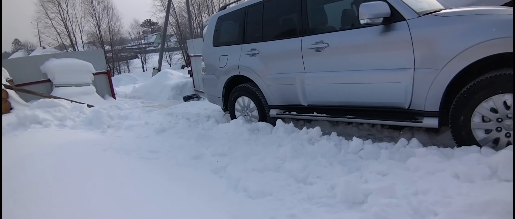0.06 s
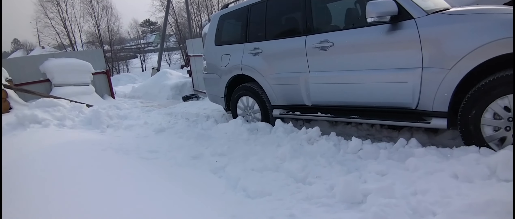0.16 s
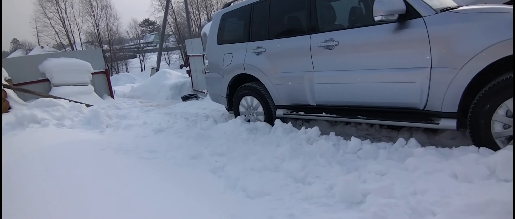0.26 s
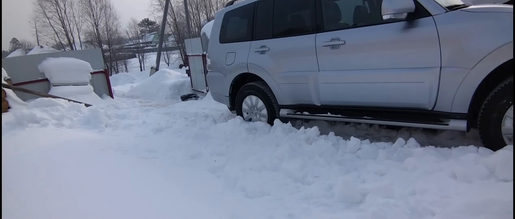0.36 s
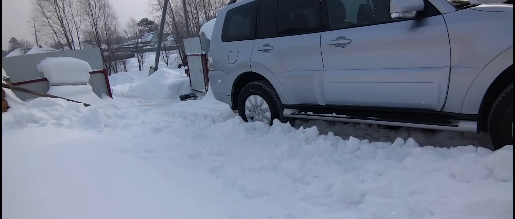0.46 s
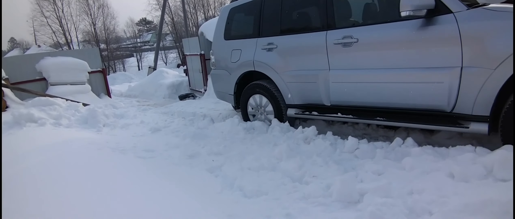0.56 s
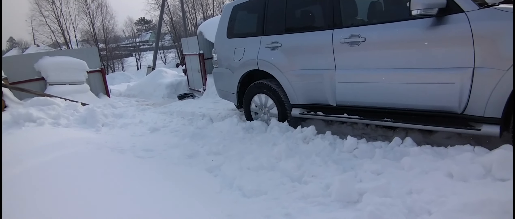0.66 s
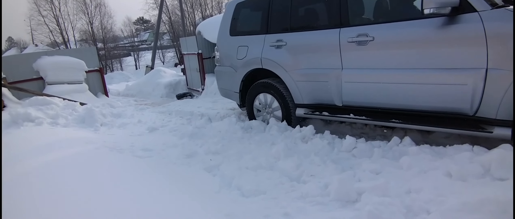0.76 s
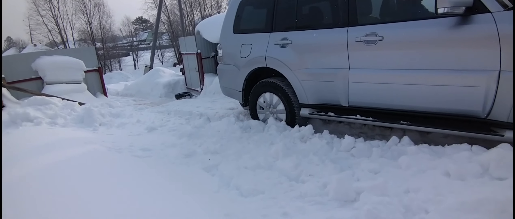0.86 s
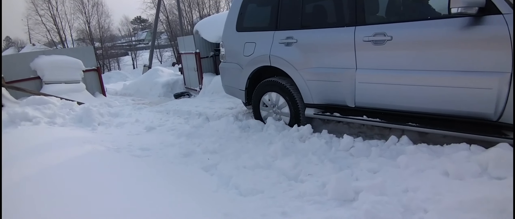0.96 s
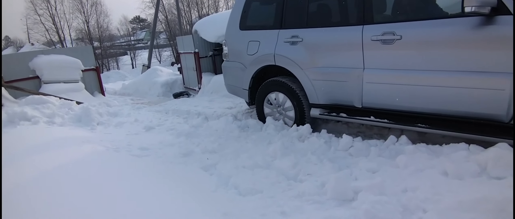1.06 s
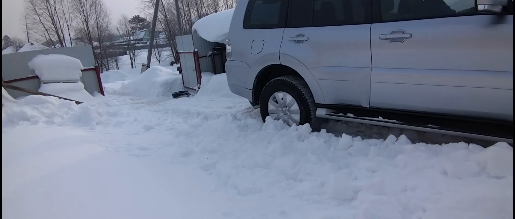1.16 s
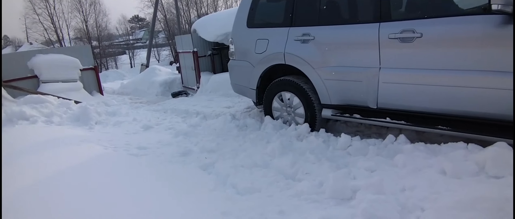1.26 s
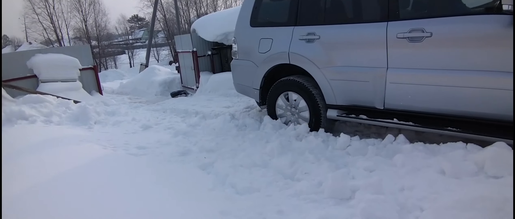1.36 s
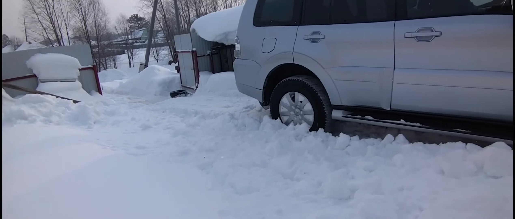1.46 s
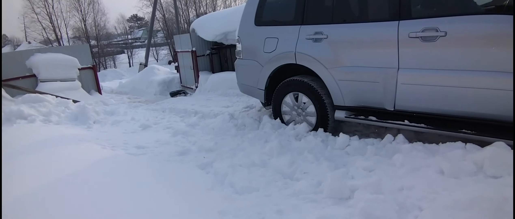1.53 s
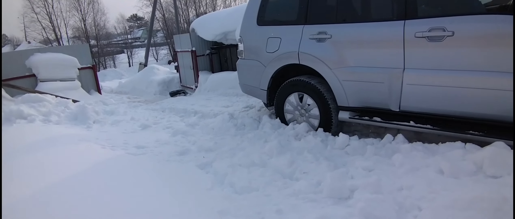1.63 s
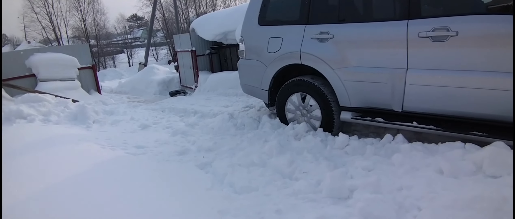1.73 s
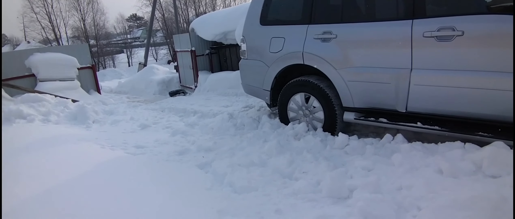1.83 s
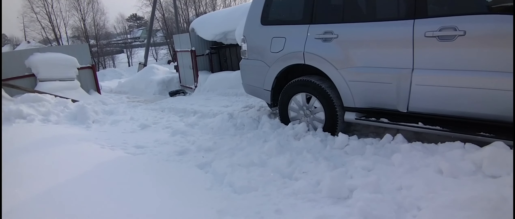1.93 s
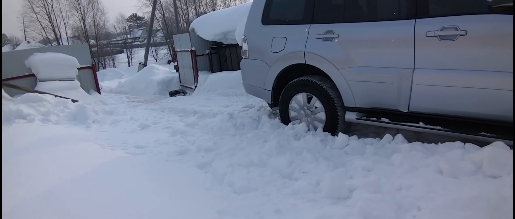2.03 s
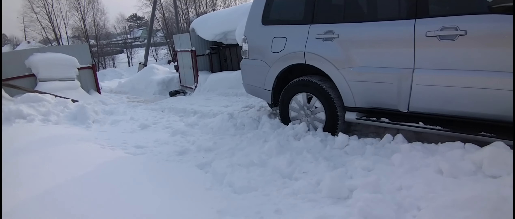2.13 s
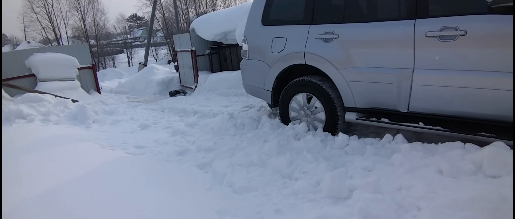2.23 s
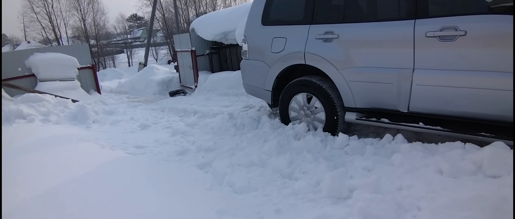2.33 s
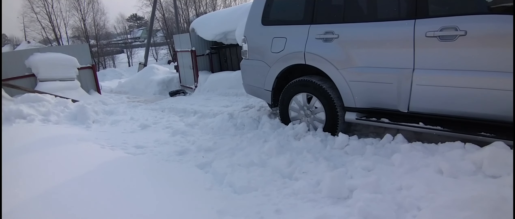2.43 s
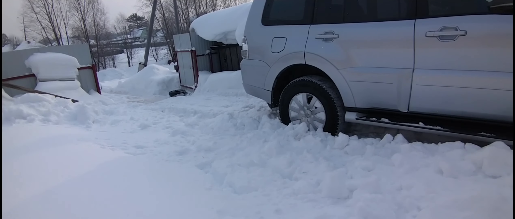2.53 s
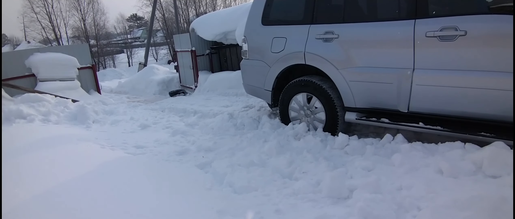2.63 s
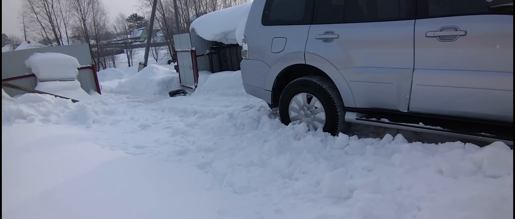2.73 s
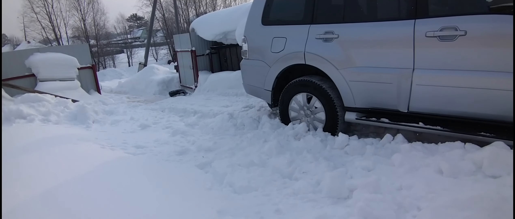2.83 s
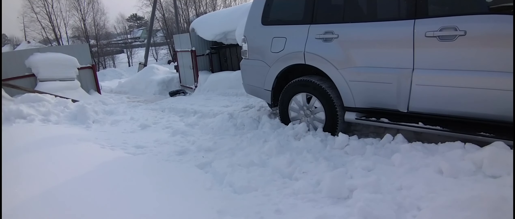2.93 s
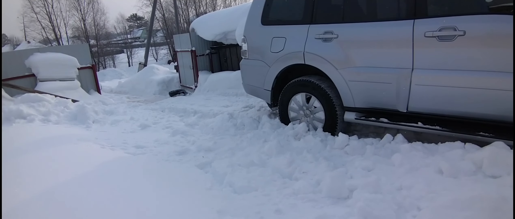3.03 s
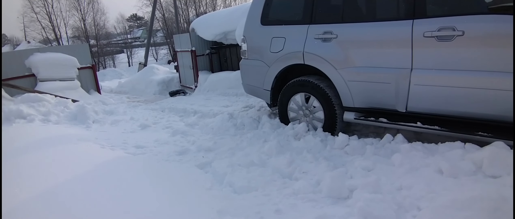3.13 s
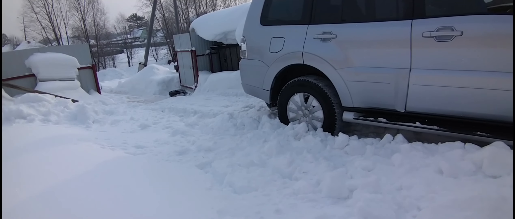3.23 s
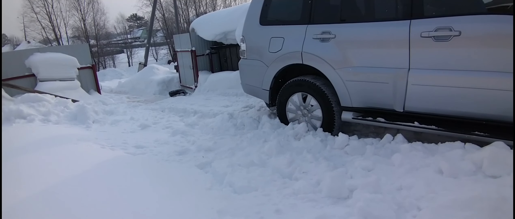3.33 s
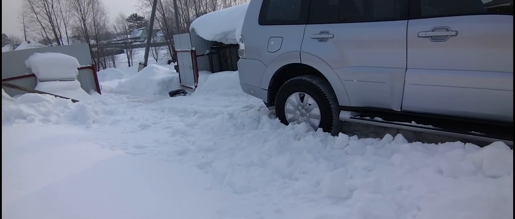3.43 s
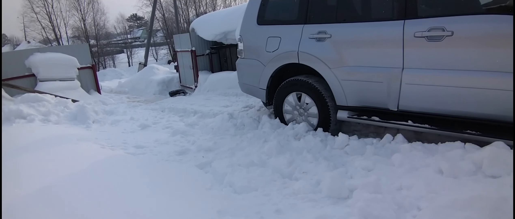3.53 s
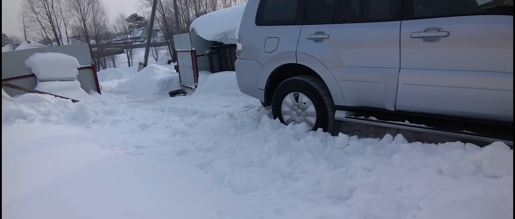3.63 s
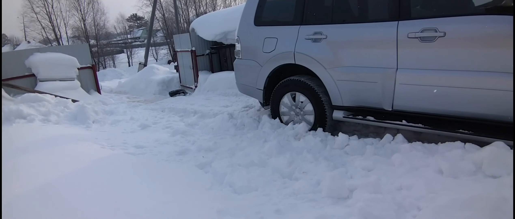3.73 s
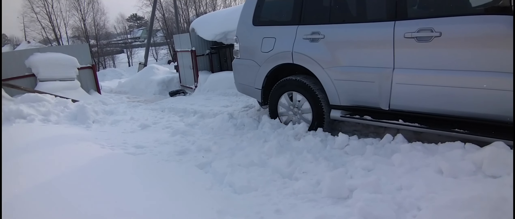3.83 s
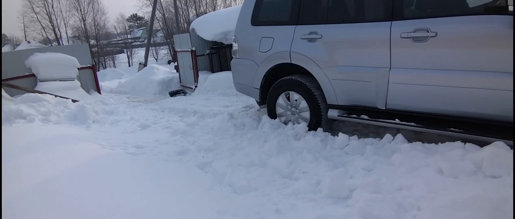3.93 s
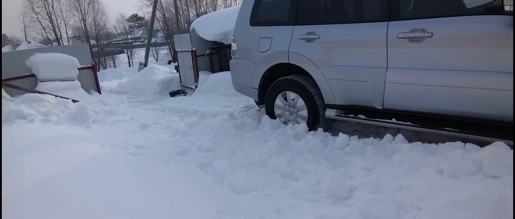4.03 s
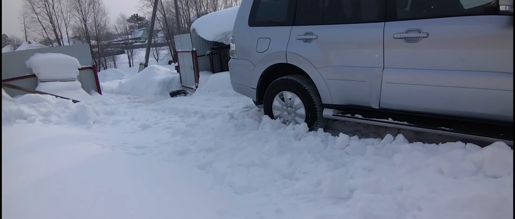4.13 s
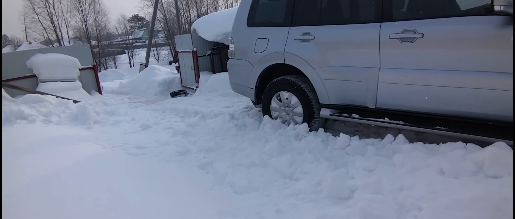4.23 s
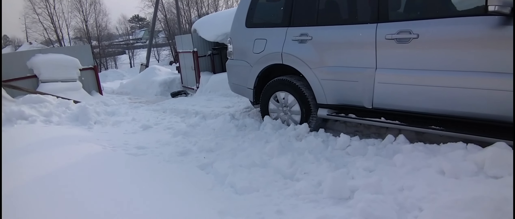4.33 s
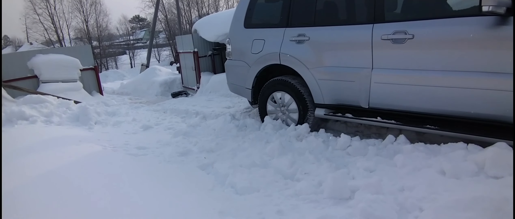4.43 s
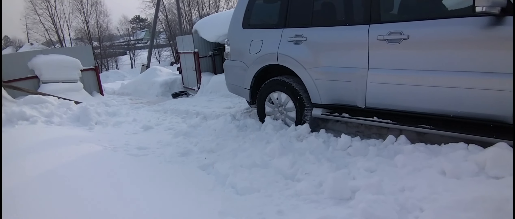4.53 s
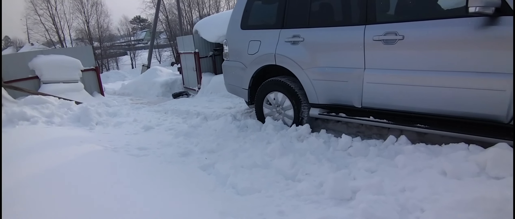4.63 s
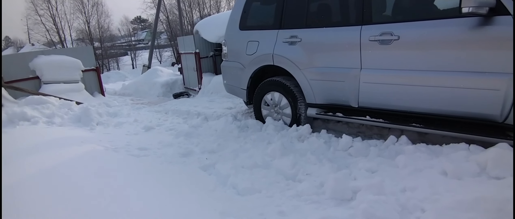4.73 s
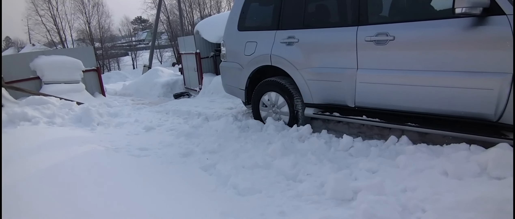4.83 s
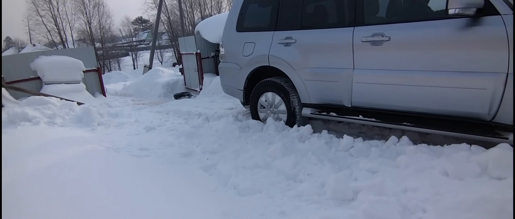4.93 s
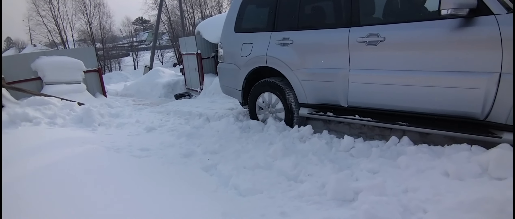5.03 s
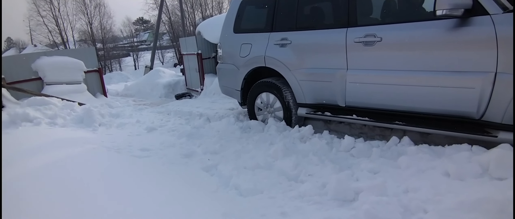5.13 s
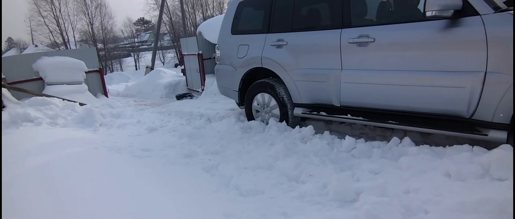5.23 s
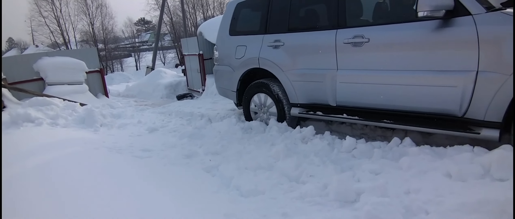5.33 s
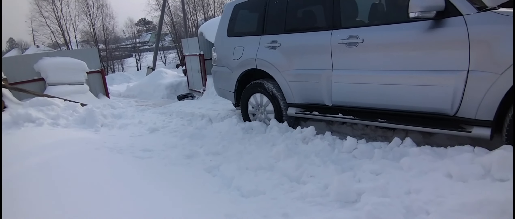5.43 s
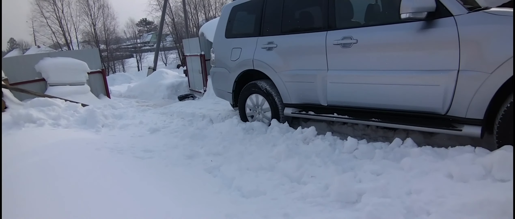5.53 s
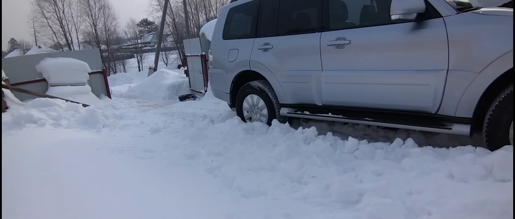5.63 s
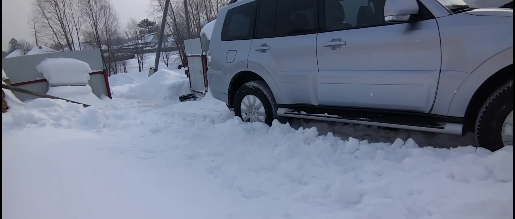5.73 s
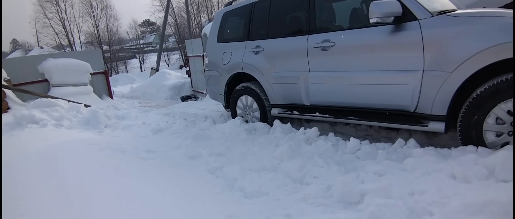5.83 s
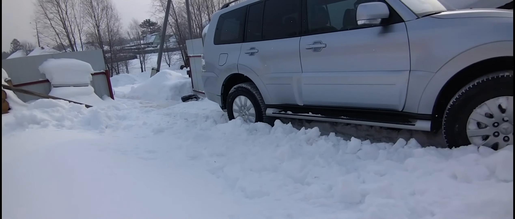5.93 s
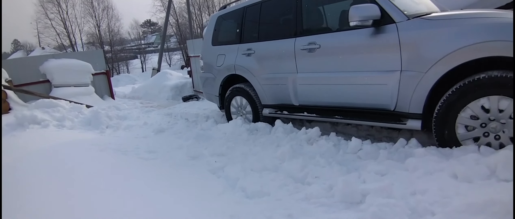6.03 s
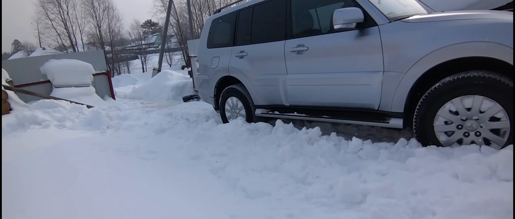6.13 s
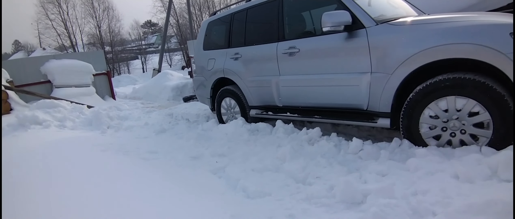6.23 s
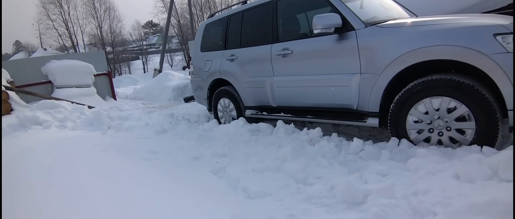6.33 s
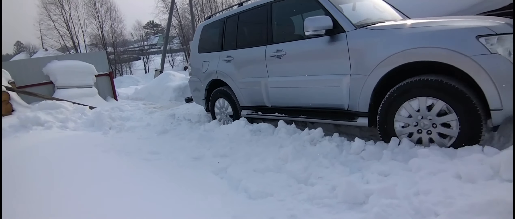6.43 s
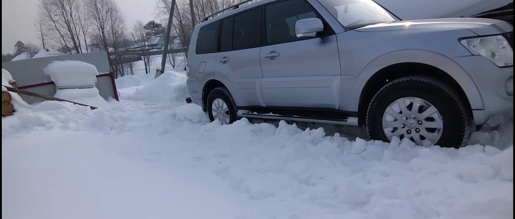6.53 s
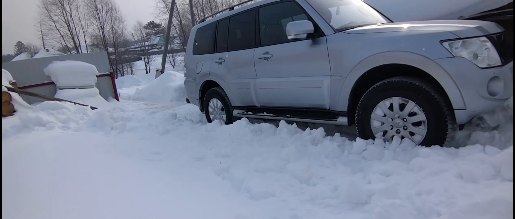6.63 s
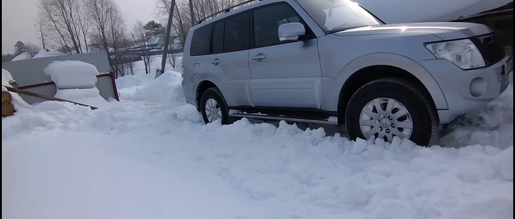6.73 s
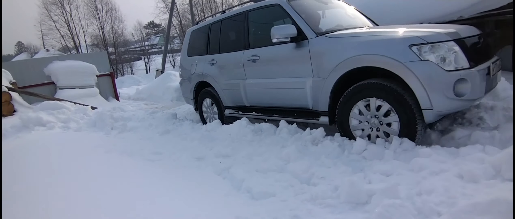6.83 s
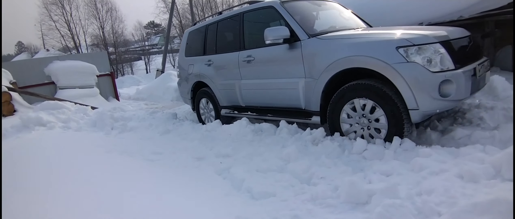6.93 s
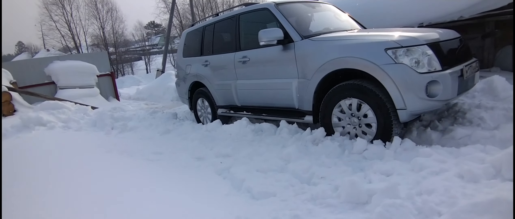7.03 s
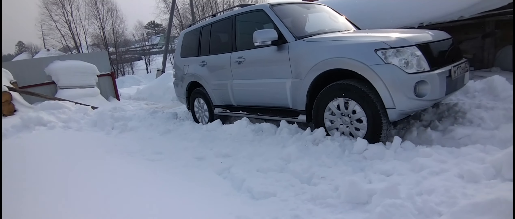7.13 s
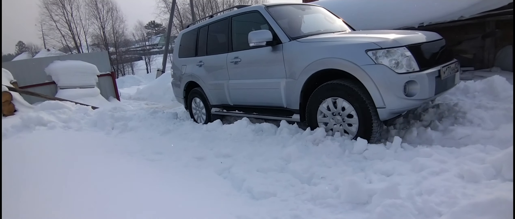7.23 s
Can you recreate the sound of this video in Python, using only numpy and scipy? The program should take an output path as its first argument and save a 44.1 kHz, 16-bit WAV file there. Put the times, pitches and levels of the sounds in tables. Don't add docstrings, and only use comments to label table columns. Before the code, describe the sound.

Outdoors in a snowy yard, a diesel off-roader works a few metres from a stereo microphone. Its engine clatters under load, then drops as tyres crush snow with dull pops and low thuds. The wheels stop and the engine idles alone; clunks follow, treads hum in slips, and the engine revs as the car rolls back, easing off at the end.

```python
import sys
import numpy as np
from scipy import signal
from scipy.fft import rfft, irfft, next_fast_len
from scipy.io import wavfile
from scipy.ndimage import map_coordinates

SR = 44100
rng = np.random.default_rng(int(sys.argv[2]) if len(sys.argv) > 2 else 0)


def dump_mix(stems):
    frames = np.atleast_2d(stems).T
    limited = np.clip(frames, -1, 1)
    pcm = np.round(limited * 32767).astype(np.int16)
    wavfile.write(sys.argv[1], SR, pcm)


def amplitude_ratio(level_db):
    exponent = np.asarray(level_db, float) / 20
    return 10 ** exponent


N = 320593
TIME_S = np.arange(N) / SR
IDLE_PER_S = 21.5
ROLLING_DB = -41


def rms_one(x):
    return x / np.sqrt(np.mean(x ** 2) + 1e-20)


def in_time(rows):
    s, *columns = np.transpose(rows)
    return [np.interp(TIME_S, s, column) for column in columns]


def drift(rate_hz):
    r = np.exp(-2 * np.pi * rate_hz * 40 / SR)
    white = rng.standard_normal(N // 40 + 2002)
    slow = signal.lfilter([1], [1, -2 * r, r * r], white)[2000:]
    return np.interp(np.arange(N) / 40, np.arange(len(slow)), rms_one(slow))


def resonate(x, hz, width_hz):
    r = np.exp(-np.pi * width_hz / SR)
    zeros = np.array([1, 0, -1]) * (1 - r * r) / 2
    poles = [1, -2 * r * np.cos(2 * np.pi * hz / SR), r * r]
    return signal.lfilter(zeros, poles, x)


def colour(x, spectrum):
    size = next_fast_len(N)
    hz, db = np.transpose(spectrum)
    bin_hz = np.arange(size // 2 + 1) * SR / size
    gain = amplitude_ratio(np.interp(np.log(bin_hz + 1), np.log(hz), db))
    return irfft(rfft(x, size) * gain, size)[..., :N]


def spread(pair, alike):
    alike = np.clip(alike, 0, 1)
    shared = np.sqrt((1 + alike) / 2) * pair[0]
    opposed = np.sqrt((1 - alike) / 2) * pair[1]
    return shared + opposed * [[1], [-1]]


def swell(s, length_s, attack_s, release_s):
    t = TIME_S - s
    return np.clip(np.minimum(t / attack_s, (length_s + release_s - t) / release_s), 0, 1)


# pitch in Hz, level in dB per Hz.
SPRAY_SPECTRUM = [(900, -49), (1600, -7.5), (2500, 0.5), (3000, -1.5), (3400, -2), (4400, -5.5), (5000, -4),
                  (5500, -8), (6300, -7), (7400, -16), (11800, -17.5), (14500, -13.5), (16000, -15.5)]


def spray(spray_db, turns):
    flicker_db = .7 * drift(7.) + 1.2 * drift(90.)
    pulse_db = 1.3 * np.cos(2 * np.pi * turns)
    grains = rng.standard_normal((2, N)) * amplitude_ratio(flicker_db + pulse_db)
    both = spread(colour(grains, SPRAY_SPECTRUM), .38)
    return amplitude_ratio(spray_db + 8.0) * rms_one(both)


# start in seconds, length in seconds, level in dB.
SHEETS = [
    (0, 0.61, -68.5),
    (0.94, 0.9, -62.5),
    (1.844, .6, -74),
    (3.703, 0.11, -65.5),
    (3.966, 0.25, -63.5),
    (5.05, 0.099, -68),
    (5.636, 0.32, -66),
    (6.195, .18, -59.5),
    (6.402, 0.2, -60.5),
    (6.93, 0.078, -77),
]


def thrown(crush_db, turns):
    sheets = sum(amplitude_ratio(db) * swell(s, length_s, .04, .05) for s, length_s, db in SHEETS)
    rolling = amplitude_ratio(-66 + 1.6 * np.minimum(crush_db - ROLLING_DB, 0))
    intake = amplitude_ratio(-74)
    power = intake ** 2 + rolling ** 2 + sheets ** 2
    hiss = spray(10 * np.log10(power), turns)
    sheet_share = sheets ** 2 / power
    return hiss - 0.36 * sheet_share * resonate(hiss, 3160, 2000.0)


# start in seconds, peak in dB, pitch in Hz, 60 dB decay in seconds.
CLUNKS = [(2.885, -45, 333, 0.12), (2.92, -40, 605, .05), (2.99, -54, 2100, 0.16), (3.03, -49, 1920, 0.14),
          (3.06, -45.5, 1730, 0.19), (3.085, -54, 1900, .08), (3.421, -39, 890, 0.043),
          (3.466, -36.5, 590, 0.073), (3.518, -28, 335, 0.044), (3.997, -33, 607, .02),
          (5.378, -35, 696, .02), (5.794, -34, 554, .015), (6.696, -46, 800, 0.034),
          (6.735, -37.5, 736, 0.051), (6.769, -38, 730, .03), (6.835, -58, 6100, .18),
          (6.87, -55, 5860, 0.13), (7.14, -56, 2030, 0.28)]


def clunks():
    out = np.zeros(N)
    t = np.arange(SR // 5) / SR
    for s, db, hz, t60_s in CLUNKS:
        noise = resonate(rng.standard_normal(len(t)), hz, .2 * hz)
        rattle = rms_one(resonate(noise, hz, .5 * hz))
        tone = np.sin(2 * np.pi * hz * t) * (hz < 1500)
        hit = amplitude_ratio(db - 60 * t / t60_s) * (.5 * tone + .7 * rattle)
        at = round(s * SR)
        out[at:at + len(t)] += hit[:N - at]
    return out


# start in seconds, length in seconds, start Hz, end Hz, level in dB.
SLIPS = [
    (1.897, 0.16, 150.6, 160, -45.5),
    (3.243, 0.13, 159.6, 166.1, -48),
    (3.423, 0.18, 165, 148.2, -41.5),
    (3.801, 0.178, 169.2, 186.8, -46),
    (4.016, .16, 145.8, 162.3, -41),
    (4.196, .18, 145.8, 174.4, -37),
    (4.397, 0.084, 172, 150.5, -43.5),
    (4.5, 0.13, 150, 179, -38.5),
    (4.628, 0.092, 170.4, 146, -35.5),
]


def boom():
    points = []
    for s, length_s, start_hz, end_hz, _ in SLIPS:
        points += [(s, start_hz), (s + length_s, end_hz)]
    hz = in_time(points)[0] * (1 + 0.0216 * drift(23.6))
    level = sum(amplitude_ratio(db) * swell(s, length_s, .039, .039) for s, length_s, _, _, db in SLIPS)
    hum = np.sqrt(2) * np.sin(2 * np.pi * np.cumsum(hz) / SR)
    return level * amplitude_ratio(0.47 * drift(20.0)) * hum


# start in seconds, peak in dB, pitch in Hz.
SLUMPS = [(0.129, -30, 73), (0.479, -19, 200), (0.94, -19.5, 91.5), (1.42, -20, 77.5), (1.493, -14, 128),
          (1.619, -15.5, 70.6), (1.761, -36, 79), (3.269, -22.5, 150), (3.425, -20.5, 98),
          (3.506, -35, 164), (3.991, -24, 98.2), (4.11, -18, 109), (4.853, -22, 98), (5.087, -34, 74),
          (5.341, -24, 69.6), (5.506, -26, 121), (5.912, -19, 88), (6.339, -27, 89.5), (6.523, -23, 108),
          (6.687, -29, 96), (6.942, -21.5, 124), (7.15, -24, 112), (7.199, -38, 110)]


def slumps():
    out = np.zeros(N)
    for s, db, hz in SLUMPS:
        cycles = np.arange(int(4 * SR / hz)) * hz / SR
        envelope = np.e * cycles * np.exp(-cycles) * (1 - cycles / 4)
        thud = amplitude_ratio(db - 7.5) * envelope * np.sin(2 * np.pi * cycles)
        at = round(s * SR)
        out[at:at + len(thud)] -= thud[:N - at]
    return out


# time in seconds, crush level in dB.
TYRES = [(0, -40.5), (.3, -42.5), (.6, -41), (1.3, -41), (1.55, -40), (1.97, -42.5), (2.07, -48.5),
         (2.22, -70), (2.84, -68), (3.0, -55.5), (3.15, -52), (3.55, -43), (4.0, -42.5), (5.2, -42),
         (5.6, -40), (6.1, -39), (6.6, -37), (7.27, -39.5)]


def tyre_level():
    return in_time(TYRES)[0]


# pitch in Hz, level in dB per Hz.
CRUSH_SPECTRUM = [(11, -36), (18, -5), (53, 0.5), (118, 0), (406, -11.5), (675, -16.5), (741, -15.5),
                  (1250, -24), (1600, -19), (2080, -37), (3520, -120)]


def crush(crush_db, shade_db):
    sizes = amplitude_ratio(2.2 * np.minimum(rng.exponential(1, (2, N)), 4)) * rng.choice([-1, 1], (2, N))
    pops_per_s = 1100 * amplitude_ratio(1.5 * drift(12.))
    pops = sizes * (rng.random((2, N)) < pops_per_s / SR)
    dealt = rng.integers(0, 8, N)
    pitches_hz = np.geomspace(45, 900, 8)
    rung = sum(resonate(pops * (dealt == k), hz, 0.59 * hz) for k, hz in enumerate(pitches_hz))
    snow = colour(rms_one(rung) + 1.65 * rng.standard_normal((2, N)), CRUSH_SPECTRUM)
    low = signal.sosfilt(signal.butter(2, 400, fs=SR, output="sos"), snow)
    high = signal.sosfilt(signal.butter(2, 400, "high", fs=SR, output="sos"), snow)
    upper_db = -9.5 - 0.46 * (crush_db - ROLLING_DB) + 0.76 * shade_db
    both = spread(low, 1.0) - amplitude_ratio(upper_db + 9.5) * spread(high, 0.72)
    return amplitude_ratio(crush_db + 5.0) * rms_one(both)


# time in seconds, firings per second.
FIRING = [(0.0, 31.57), (0.32, 31.5), (0.59, 29.66), (0.83, 20.13), (1.11, 24.78), (1.54, 22.3),
          (2.76, 21.14), (3.27, 23.41), (3.59, 20.77), (3.84, 26.08), (4.14, 29.79), (4.82, 30.72),
          (5.16, 32.91), (5.82, 33.48), (5.92, 31.19), (6.1, 22.19), (6.41, 24.06), (7.27, 21.09)]
# time in seconds, knock in dB, exhaust in dB.
LOAD = [(0, -56, -44), (.5, -58.5, -45.5), (.9, -62, -44), (1.3, -62.5, -44.5), (1.7, -62, -36.5),
        (2.0, -61.5, -38.5), (2.3, -63.5, -42), (2.8, -63, -44.5), (3.07, -61.5, -37), (3.5, -63, -44),
        (3.9, -60, -48), (4.4, -58.5, -42.5), (5.0, -58, -41.5), (5.5, -57.5, -41.5), (5.95, -59, -49),
        (6.25, -65, -49), (6.8, -63.5, -38.5), (7.27, -63.5, -58)]


def engine_state():
    rate = in_time(FIRING)[0]
    turns = .39 + np.cumsum(rate) / SR
    knock_db, thump_db = in_time(LOAD)
    return rate, turns, knock_db, thump_db


# pitch in Hz, width in Hz, level in dB, valve share.
BLOCK = [(389, 50, 2, 0.17), (723, 12.5, 1, 0.2), (1055, 430, 1.5, 0.29), (1520, 420, 2.5, 0.084),
         (1920, 148, -4.5, 0.65), (2430, 445, 0, 0.14), (2840, 450, -1.5, 0.44), (3620, 260, -1, 1),
         (4890, 210, -4, 0.15), (6090, 210, -6, 1)]


def knock(turns, rate, knock_db, shade_db):
    turns = turns + .04
    lower_db, upper_db = 1 + 0.36 * shade_db, -1.17 + .7 * shade_db
    load = np.clip((rate - 22) / 9, 0, 1)
    firing = (turns + .55).astype(int)
    phase = turns - np.round(turns + .05)
    early = phase + .04 * load - .02
    burst_turns = np.where(early < 0, .03 + .035 * load, .18)
    burst = np.exp(-np.abs(early / burst_turns) ** 1.6)
    valves = (1 - .55 * load) * np.exp(-((phase + .37 - .06 * load) / .09) ** 2)
    cylinder_db = np.array([-2.9, -3.0, -3.0, -3.5])[firing % 4]
    shared_db = .8 * rng.standard_normal(256)[firing]
    white = rng.standard_normal((2, 2, N))
    white[:, 0] += 8 * (np.diff(np.sign(early), prepend=1) > 0)
    out = 0
    for k, (hz, width_hz, db, valve_share) in enumerate(BLOCK):
        own_db = 1.4 * rng.standard_normal((256, 2))[firing].T
        rustle = 1.2 if hz < 900 else .4
        combustion = burst * amplitude_ratio(cylinder_db + shared_db + own_db[0])
        gate = rustle + combustion + valve_share * valves * amplitude_ratio(own_db[1])
        ringing = resonate(gate * white[k % 2], hz, width_hz)
        ringing = rms_one(resonate(ringing, hz, 2.9 * width_hz))
        if hz > 3300:
            side_db = upper_db
        elif 900 < hz < 2300:
            side_db = lower_db
        else:
            side_db = -4 * load * (hz < 900)
        out = out + amplitude_ratio(db + side_db) * spread(ringing, .98 - hz / 16000)
    return amplitude_ratio(knock_db) * out


def exhaust(turns, rate, thump_db):
    over_idle = rate - IDLE_PER_S
    tone_db = thump_db - 23 + 1.74 * over_idle
    octave_db = thump_db - 7 + 0.36 * over_idle
    order = np.arange(1, 9)[:, None]
    hz = order * rate
    lag = .072 * hz + .2 * (order == 2) * over_idle
    waves = np.sqrt(2) * np.cos(2 * np.pi * order * turns + 5.0 - lag)
    silencer = 1 / (1 + np.abs((hz[2:] - 81) / 21) ** 2.8)
    uneven = amplitude_ratio([1.9 * drift(10.4) for _ in silencer])
    thump = (silencer * uneven * waves[2:]).sum(0)
    return amplitude_ratio(thump_db - 6.0) * thump + amplitude_ratio(tone_db) * waves[0] + amplitude_ratio(octave_db) * waves[1]


# time in seconds, left later in ms, left louder in dB, shade by the wing in dB.
BEARING = [(0, 0.31, -.5, -3.5), (1, .42, -0.5, -1.3), (2, 0.46, -0.5, -2), (4, 0.45, -0.8, 0.3),
           (5, 0.41, -1.1, -0.1), (5.8, 0.36, -0.4, 0), (6.4, 0.23, 0, -8.5), (7.27, 0.11, 0.9, -11)]


def bearing():
    return in_time(BEARING)


def at_ports(car, later_ms, left_db):
    left = map_coordinates(car[0], [np.arange(N) - later_ms * SR / 1000], order=3, mode="nearest")
    left = left - 0.24 * resonate(left, 9500.0, 7600.0)
    right = car[1] + 1.03 * 0.39 * resonate(car[1], 5300.0, 15000.0)
    return np.array([left * amplitude_ratio(left_db / 2), right * amplitude_ratio(-left_db / 2)])


def scene():
    rate, turns, knock_db, thump_db = engine_state()
    crush_db = tyre_level()
    later_ms, left_db, shade_db = bearing()
    car = thrown(crush_db, turns) + crush(crush_db, shade_db)
    car = car + knock(turns, rate, knock_db, shade_db) + exhaust(turns, rate, thump_db)
    return at_ports(car, later_ms, left_db) + clunks() + boom() + slumps()


def top_cut(x):
    return signal.sosfilt(signal.butter(12, 16520, fs=SR, output="sos"), x)


def record(dry):
    dipped = dry - 0.27 * resonate(dry, 3325, 440)
    cut = signal.sosfilt(signal.ellip(12, .5, 80, 15720, fs=SR, output="sos"), dipped)
    return top_cut(cut)


dry = scene()
out = record(dry)
dump_mix(out)
```